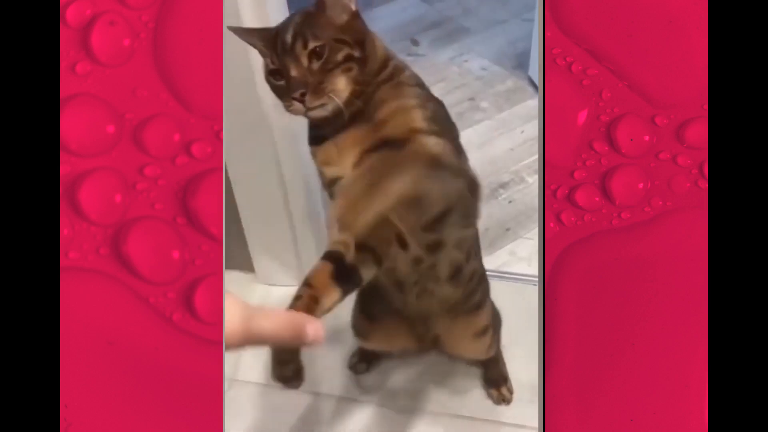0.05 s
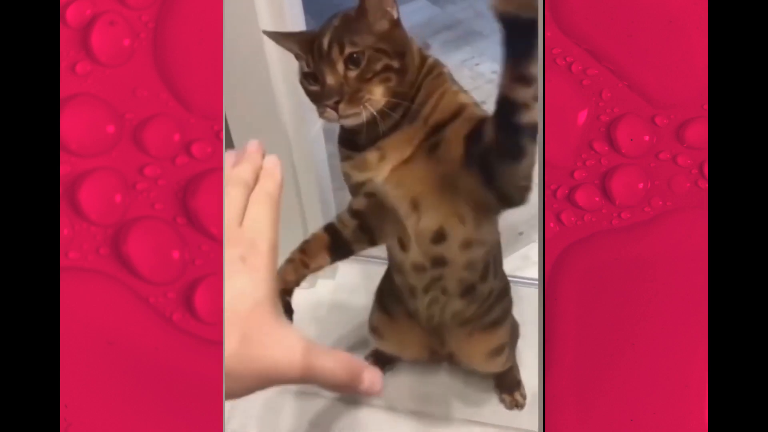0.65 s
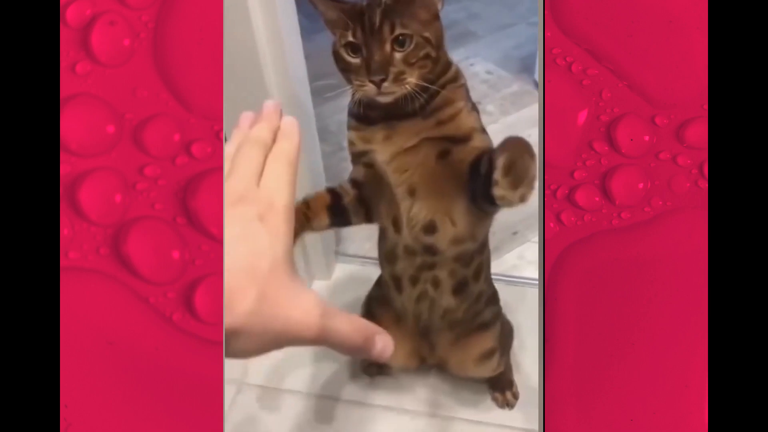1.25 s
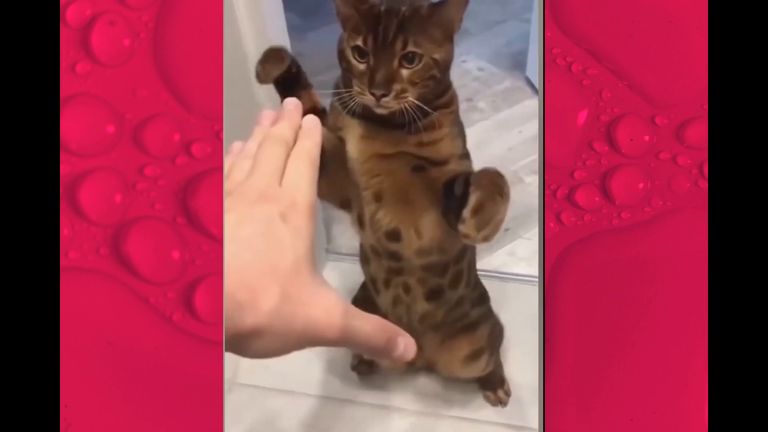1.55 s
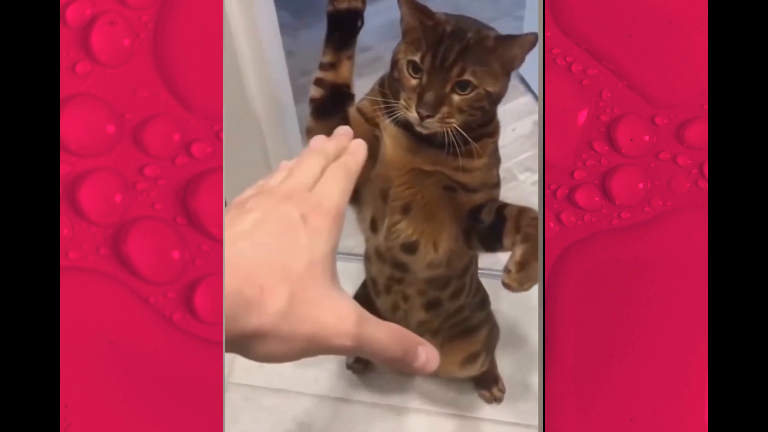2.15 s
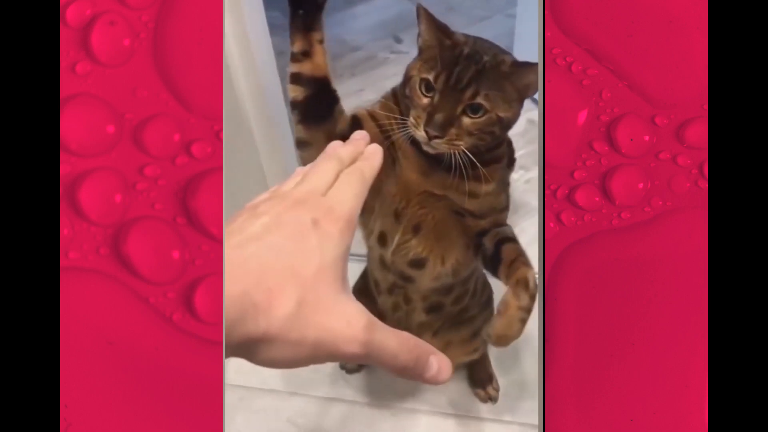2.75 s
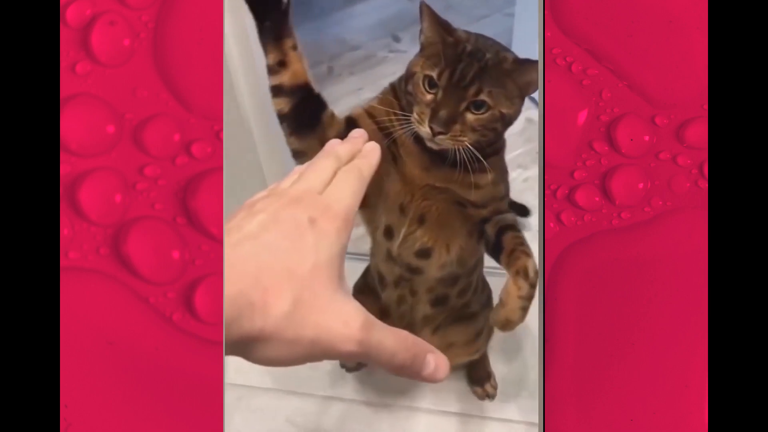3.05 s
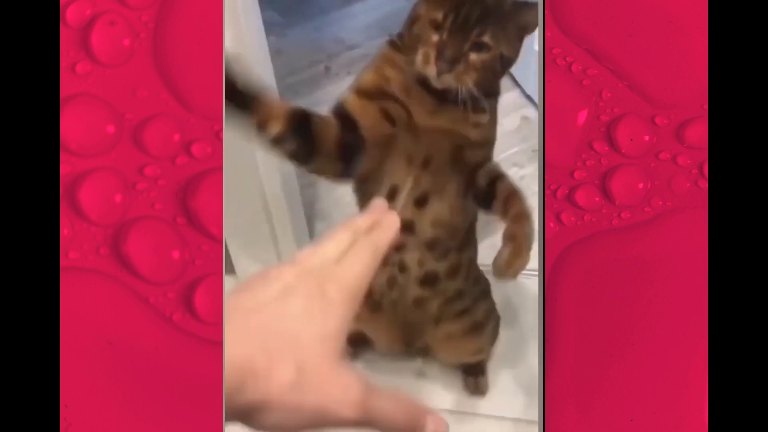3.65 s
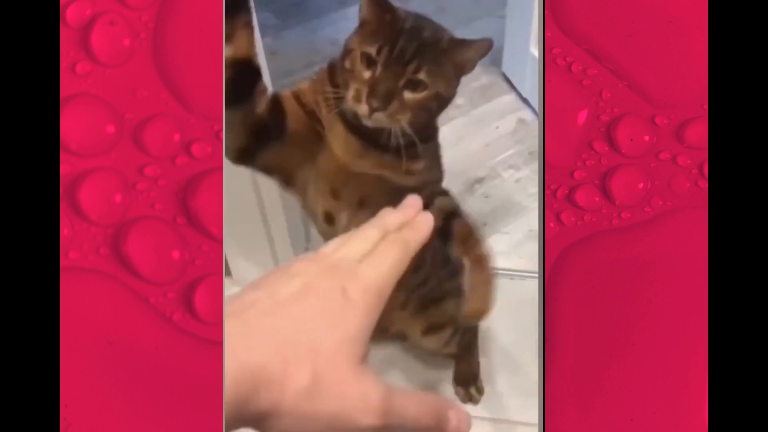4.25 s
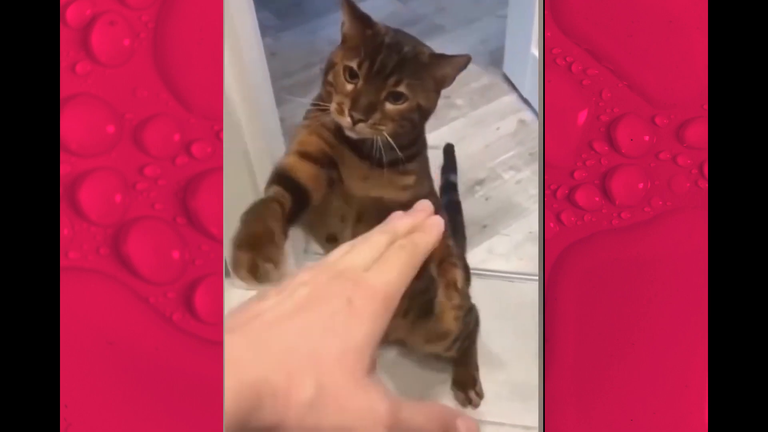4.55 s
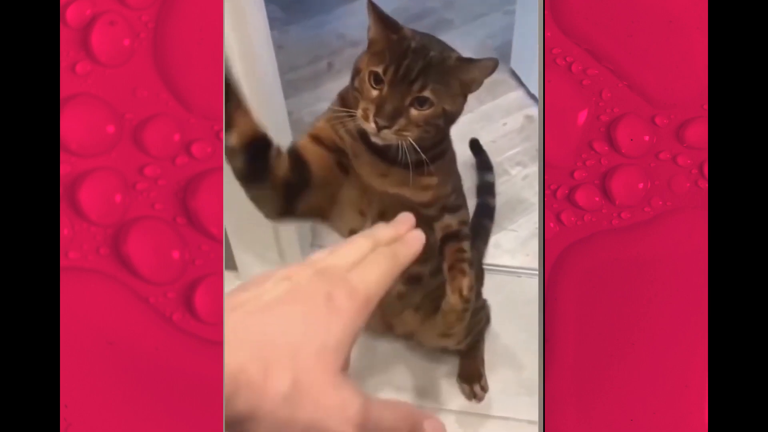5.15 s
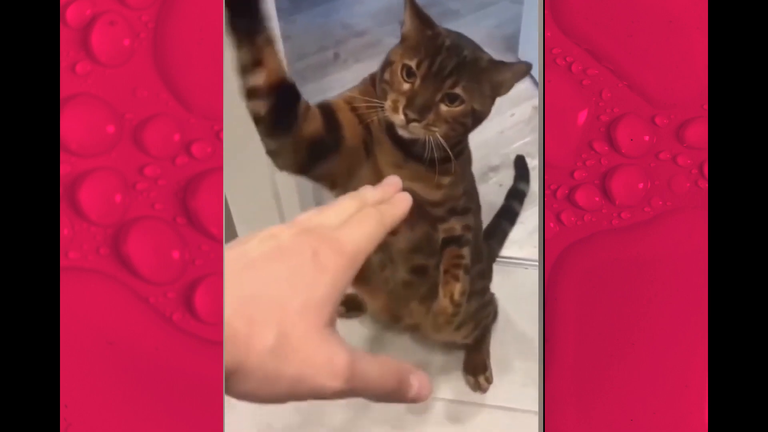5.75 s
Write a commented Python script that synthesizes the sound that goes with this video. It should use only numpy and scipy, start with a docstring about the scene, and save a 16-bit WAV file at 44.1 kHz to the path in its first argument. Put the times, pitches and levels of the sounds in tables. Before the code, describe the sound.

A cat slaps a person's open hand three times, each blow a fleshy thud and hollow clap with a low boom from the floor. In a pause, a faint low hum swells and a paw shifts softly. Six more slaps follow, two of them duller thuds. The microphone is close, in a small hard-walled hallway that reverberates, and a quick electronic flutter echo trails every hit.

```python
"""A small hard-walled hallway, one microphone near a cat that stands on its hind legs and slaps an open hand.
Three slaps come in the first second, each a thud of flesh, a hollow clap of the palm, a pop of trapped
air and a crack of skin, with a boom from the floor. In the pause a faint low hum swells, sags and
falls back, and a paw shifts. From 3.6 s six more blows follow, the second and third mostly thud.
Throughout, the hallway reverberates and an electronic echo repeats everything as a quick flutter."""
import sys
import numpy as np
from scipy import signal
from scipy.fft import rfft, irfft
from scipy.io import wavfile

SR = 44100
rng = np.random.default_rng(int(sys.argv[2]) if len(sys.argv) > 2 else 0)


def master(y):
    """Save y as 16-bit WAV."""
    cut = np.clip(np.atleast_2d(y).T, -1, 1)
    pcm = np.round(cut * 32767)  # scale
    wavfile.write(sys.argv[1], SR, pcm.astype(np.int16))


N = 255339
TIME = np.arange(N) / SR


def from_db(db):
    return 10 ** (np.asarray(db) / 20)


def unit_energy(x):
    return x / np.sqrt(np.sum(x ** 2) + 1e-20)


def rms_one(x):
    return unit_energy(x) * np.sqrt(len(x))


def add(out, start_s, sound):
    start = max(round(start_s * SR), 0)
    out[start:start + len(sound)] += sound[:N - start]


def band(x, low_hz, high_hz, order=2):
    sos = signal.butter(order, [low_hz, min(high_hz, .45 * SR)], "band", fs=SR, output="sos")
    return signal.sosfilt(sos, x + 1e-18)


def resonate(x, hz, width_hz):
    """One resonance, gain 1 at its peak."""
    r = np.exp(-np.pi * width_hz / SR)
    poles = [1, -2 * r * np.cos(2 * np.pi * hz / SR), r * r]
    return signal.lfilter(np.array([1, 0, -1]) * (1 - r * r) / 2, poles, x + 1e-18)


def ringing(modes):
    """A sum of decaying sines, energy 1."""
    t = TIME[:SR]
    sines = (from_db(db - 60 * t / t60_s) * np.sin(2 * np.pi * hz * t) for hz, db, t60_s in modes)
    return unit_energy(sum(sines))


# Spectrum of the hallway's still air: frequency_hz, relative_density_db
AIR_SPECTRUM = [(15, -70.5), (25, -35.5), (47, -8.5), (70, -16), (84, -6), (99, -16), (132, -15),
                (278, -15.5), (510, -22.5), (821, -23), (1010, -25.5), (1100, -25.5), (1720, -31.5),
                (6460, -42), (13900, -55.5)]
# Steady tones in that air: pitch_hz, relative_level_db
STEADY_TONES = [(199.2, -81), (839.8, -82), (920.5, -90.5)]
def room_tone():
    """All around the microphone: a steady dull hiss with faint tones."""
    hz, db = np.transpose(AIR_SPECTRUM)
    bins_hz = np.arange(N // 2 + 1) * SR / N
    colour = from_db(np.interp(np.log(bins_hz + 1), np.log(hz), db))
    hiss = rms_one(irfft(rfft(rng.standard_normal(N)) * colour, N))
    tones = sum(from_db(db) * np.sin(2 * np.pi * hz * TIME) for hz, db in STEADY_TONES)
    return from_db(-65) * hiss + from_db(-4) * tones


def hum(start_s=1.36, end_s=2.68, attack_s=0.26, release_s=0.1, pitch_hz=68.3, sag_db_per_s=10):
    """Far in the background, a low wavering hum: faint throughout, with one swell that slowly sags."""
    rise = np.clip((TIME - start_s) / attack_s, 0, 1)
    fall = np.clip((end_s - TIME) / release_s, 0, 1)
    held_s = np.maximum(TIME - start_s - attack_s, 0)
    swell = rise * fall * from_db(-61.5 - sag_db_per_s * held_s)
    waver = rms_one(resonate(rng.standard_normal(N), pitch_hz, width_hz=19))
    return (from_db(-74) + swell) * rms_one(np.sin(2 * np.pi * pitch_hz * TIME) + 0.5 * waver)


def flutter_echo(x, strong_gain, tail_gain, feedback):
    """Electronic echo: a faint repeat at 50 ms, a strong one at 75 ms, then weaker ones every 25 ms."""
    delay, step = 3307, 1102   # samples
    taps = np.zeros(delay + 8 * step)
    taps[0], taps[delay - step], taps[delay] = 1, -.07, strong_gain
    taps[delay + step::step] = tail_gain * feedback ** np.arange(7)
    return signal.fftconvolve(x, taps[None])[:, :N]


# Diffuse reverberation of the hallway: frequency_hz, relative_level_db, t60_s
REVERB_BANDS = [(101, 0.5, .3), (230, -7.5, 0.39), (390, -2, 0.26), (602, -5.5, 0.35), (1100, -2, 0.41),
                (2200, -6, 0.31), (4000, -9.5, 0.35), (7000, -3.5, 0.2), (11860, -8.5, 0.17)]
# Low ringing tones after each slap, from the room and the flutter echo: pitch_hz, relative_level_db, t60_s
RINGING_TONES = [(199.83, -6, 0.58), (229, -1.5, 0.13), (263, -12, 0.44), (283, 3, 0.39),
                 (359.8, -2.5, 0.32), (400, 1.5, 0.24), (499, 3.5, 0.11)]
def hallway(x):
    """Walls close to the microphone answer at once; then come a diffuse tail and low ringing tones."""
    t, tail = TIME[:SR], 0
    hz, levels_db, t60s_s = np.transpose(REVERB_BANDS)
    edges_hz = np.geomspace(80, 16000, 16)
    build_up = np.clip((t - .002) / 0.0034, 0, 1)
    for low, high in zip(edges_hz, edges_hz[1:]):
        log_centre = np.log(low * high) / 2
        db = np.interp(log_centre, np.log(hz), levels_db)
        t60_s = np.interp(log_centre, np.log(hz), t60s_s)
        dying = band(rng.standard_normal(len(t)), low, high) * from_db(-60 * t / t60_s) * build_up
        tail += from_db(db) * unit_energy(dying) * np.sqrt(2 * (high - low) / SR)
    reflections = rng.standard_normal(len(t)) * (t > .0015) * np.exp(-t / 0.0054)
    early = unit_energy(band(reflections, 350, 21000, order=1))
    low_ring = np.roll(ringing(RINGING_TONES), round(0.005535 * SR))   # starts a moment later
    return signal.fftconvolve(x, tail + from_db(-8) * early + from_db(-20.5) * low_ring)[:N]


# Low modes of floor and room: pitch_hz, relative_level_db, t60_s
FLOOR_MODES = [(72.1, -4, 0.53), (86, -3.5, 0.37), (113, 4, 0.1), (127.3, -8, 0.33), (160.5, 6, 0.041),
               (198, -15, 0.52)]
def floor_thumps():
    """Underfoot, the cat's weight sets the low modes going at every slap and shift of the paws."""
    out = np.zeros(N)
    boom = band(ringing(FLOOR_MODES), 57, 310, order=3)
    for start_s, *_, floor_db in PAW_SLAPS:
        add(out, start_s, from_db(floor_db) * boom)
    for start_s, floor_db, *_ in PAW_SHIFTS:
        add(out, start_s, from_db(floor_db) * boom)
    return out


# Soft shifts of the paws: start_s, floor_db, rustle_db, decay_s, top_hz
PAW_SHIFTS = [(0.305, -46, -80, 0.028, 3000), (2.487, -25.5, -66.5, 0.053, 3450),
              (3.84, -23, -59.5, 0.076, 6700), (4.084, -41, -70, 0.19, 5050)]
def rustles():
    """Fur and pads slide briefly, faint even at close range."""
    out, t = np.zeros(N), TIME[:SR // 3]
    for start_s, _, rustle_db, decay_s, top_hz in PAW_SHIFTS:
        stroke = np.minimum(t / 0.0025, 1) * np.exp(-t / decay_s)
        friction = rms_one(band(rng.standard_normal(len(t)), 910, top_hz))
        add(out, start_s, from_db(rustle_db) * stroke * friction)
    return out


def pad(t, start_s, grain, grain_s):
    """One pad meets skin: a sharp push inside a brief crush of fur and skin ridges."""
    push = signal.unit_impulse(len(t), round(start_s * SR))
    crush = rng.standard_normal(len(t)) * np.exp(-abs(t - start_s) / grain_s)
    return unit_energy(push + grain * unit_energy(crush))


def hand(force, levels_db, pop_hz, smack_hz, pocket_db):
    """The struck hand answers with heavily damped resonances, added in alternating polarity."""
    thud_db, palm_db, pop_db, smack_db, crack_db = levels_db
    resonances = [(thud_db, 200, 240),   # flesh
                  (palm_db, 640, 350),   # hollow of the palm
                  (pop_db, pop_hz, pop_hz),   # trapped air
                  (smack_db, smack_hz, 1.054 * smack_hz),   # skin
                  (crack_db, 4900, 3800),
                  (-18.5 + 0.5 * smack_db, 9600, 4200)]   # fizz of fur
    body = sum((-1) ** k * from_db(db) * resonate(resonate(force, hz, width_hz), hz, width_hz)
               for k, (db, hz, width_hz) in enumerate(resonances))
    # small air pockets between the pads ring a little longer, at new pitches on every blow
    pockets = sum(resonate(body, hz, width_hz=280) for hz in (pop_hz, smack_hz, 1.5 * smack_hz))
    return body + from_db(pocket_db) * pockets


# Blows of paw on hand, levels relative: start_s, thud_db, palm_db, pop_db, smack_db, crack_db,
# pop_hz, smack_hz, second_pad_delay_s, second_pad_db, floor_db
PAW_SLAPS = [(0.029, 8.5, 8, 0.5, -1.5, -7.5, 1270, 2920, 0.0014, 5.5, -12),
             (0.5034, 11, 12, -3.5, 2, -2.5, 1620, 2700, 0.0011, -1, -13.5),
             (0.9637, 10, 12.5, 9, 3.5, -20, 1643, 3250, 0.0017, -4.5, -12.5),
             (3.5927, 12, 12, 10, 1.5, 3.5, 1560, 3050, 0.0028, -6.5, -14),
             (3.8463, 4, -0.5, -16, -19, -43, 985, 2580, 0.00069, 2.5, -7),
             (4.1561, 3, 1.5, -5.5, -7, -10, 1125, 2920, 0.0027, -1.5, -6.5),
             (4.5678, 5.5, 13, 0, -9.5, -11.5, 1240, 2830, 0.000081, -17.5, -21),
             (5.0250, 3, 9.5, -5.5, 1.5, -8.5, 1120, 2300, 0.00098, -2.5, -16),
             (5.4414, -1, 6, -12, -4.5, -13.5, 1020, 2370, 0.0034, -8, -20.5)]
def slaps():
    """Each slap straight to the microphone, and thrown into the room, where the pads' delay averages out."""
    direct, thrown, t = np.zeros(N), np.zeros(N), TIME[:SR // 16]
    lead_s = .008   # leaves time for fur to brush the hand just before contact
    impulse = signal.unit_impulse(len(t))
    for start_s, *levels_db, pop_hz, smack_hz, delay_s, second_pad_db, _ in PAW_SLAPS:
        first_pad = pad(t, lead_s, grain=0.81, grain_s=0.00096)
        second_pad = pad(t, lead_s + delay_s, grain=0.68, grain_s=0.001)
        brush = (t < lead_s) * np.exp(-abs(t - lead_s) / 0.00059)
        fur = unit_energy(rng.standard_normal(len(t)) * brush)
        force = unit_energy(first_pad + from_db(second_pad_db) * second_pad + from_db(-8.5) * fur)
        slap = hand(force, levels_db, pop_hz, smack_hz, pocket_db=0.5)
        add(direct, start_s - lead_s, from_db(-2.5) * slap)
        add(thrown, start_s, hand(impulse, levels_db, pop_hz, smack_hz, pocket_db=-13.5))
    return direct, thrown


def scene():
    """At the microphone, in mono: slaps and rustles in front, walls, floor, hum and room tone behind."""
    direct, thrown = slaps()
    rustle = rustles()
    return (direct + rustle + hallway(thrown + rustle) + floor_thumps() + room_tone() + hum())[None]


def record(dry):
    """After the microphone the echo is added; the highest treble rolls off and is then cut."""
    echoed = flutter_echo(dry, strong_gain=0.56, tail_gain=0.29, feedback=0.4859)
    softened = signal.sosfilt(signal.butter(4, 12300, fs=SR, output="sos"), echoed)
    return signal.sosfilt(signal.ellip(10, .3, 70, 13900, fs=SR, output="sos"), softened)


dry = scene()
out = record(dry)
master(out)
```